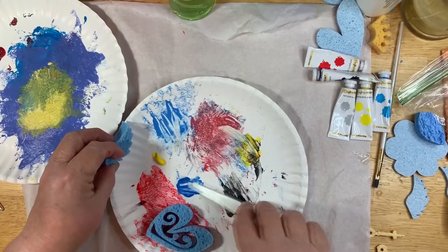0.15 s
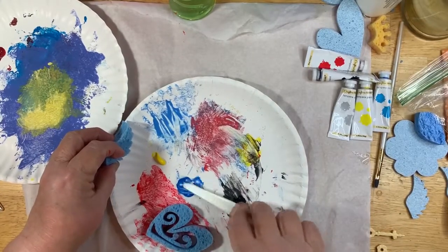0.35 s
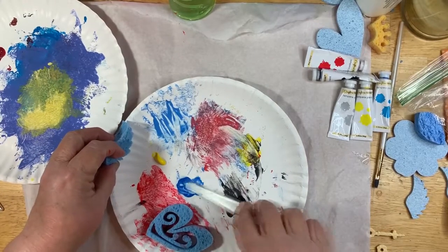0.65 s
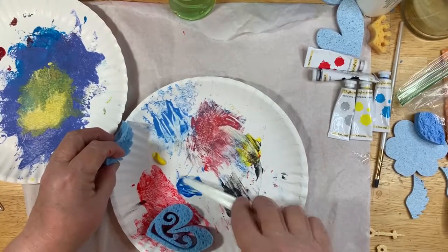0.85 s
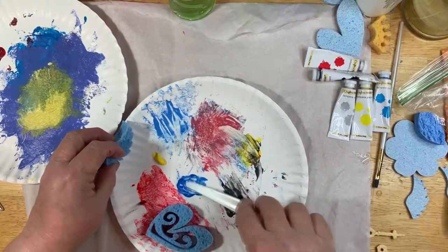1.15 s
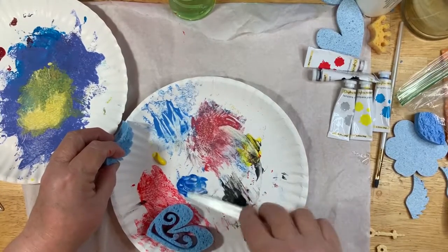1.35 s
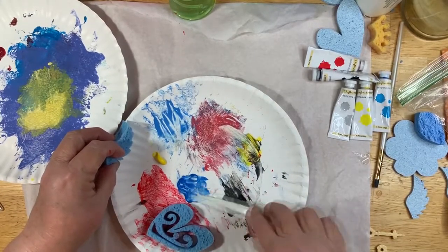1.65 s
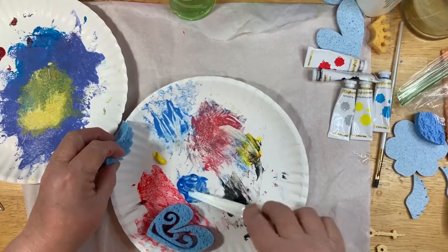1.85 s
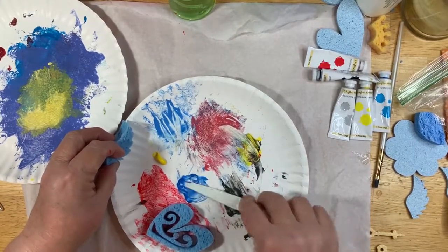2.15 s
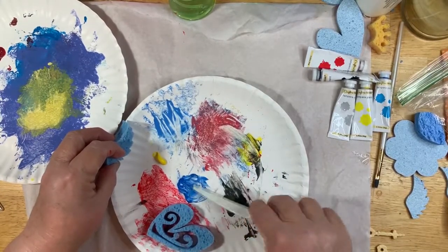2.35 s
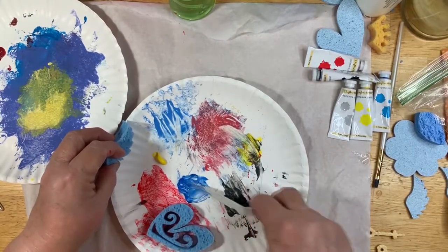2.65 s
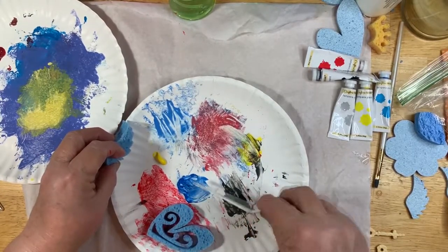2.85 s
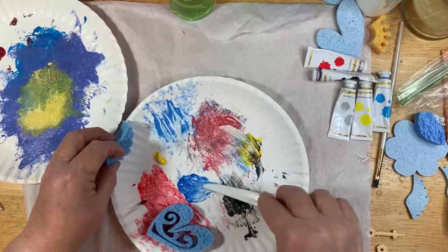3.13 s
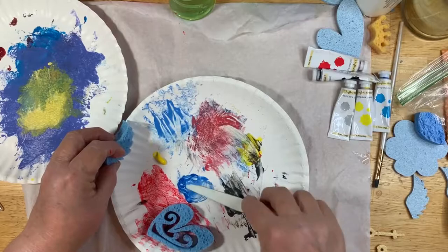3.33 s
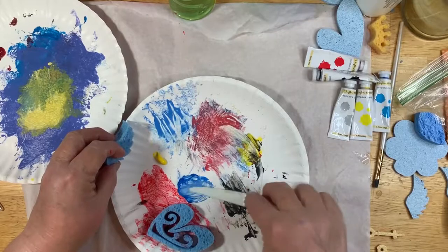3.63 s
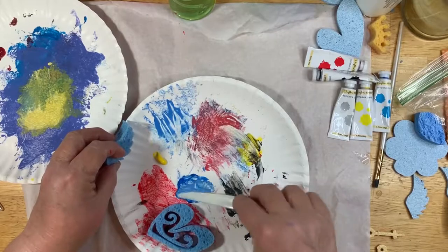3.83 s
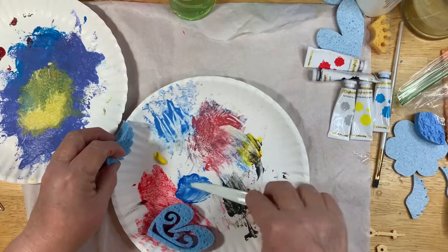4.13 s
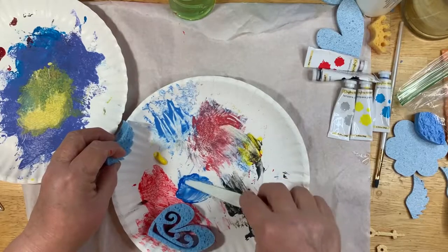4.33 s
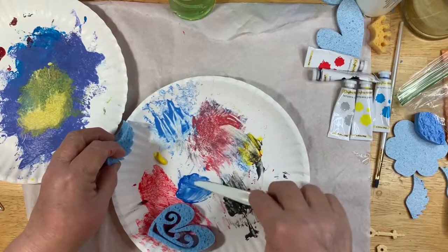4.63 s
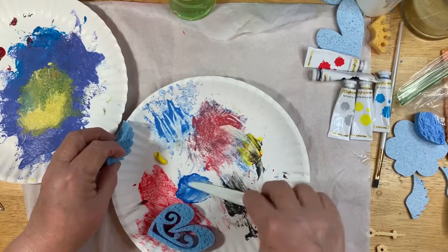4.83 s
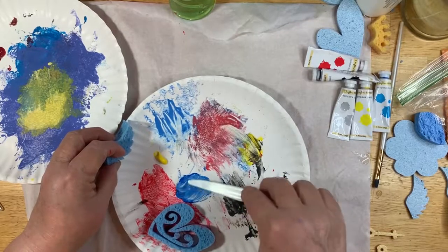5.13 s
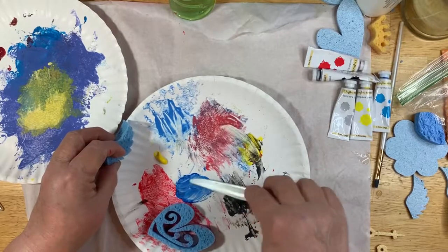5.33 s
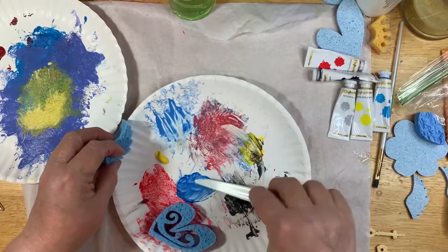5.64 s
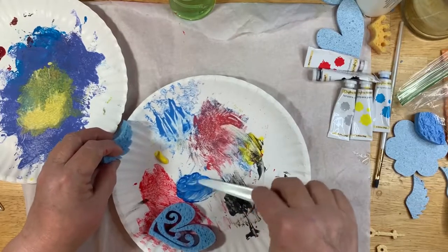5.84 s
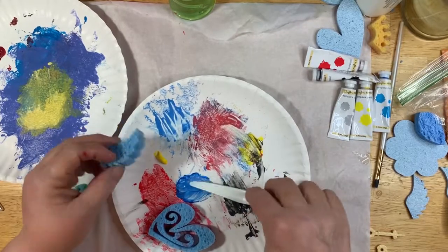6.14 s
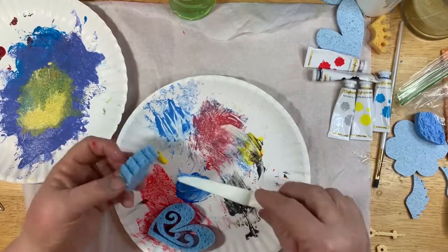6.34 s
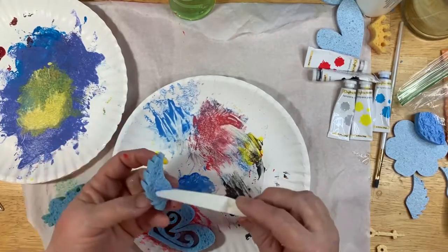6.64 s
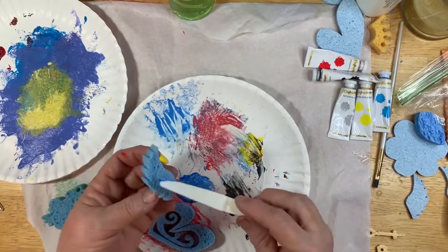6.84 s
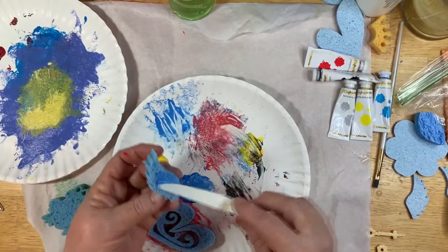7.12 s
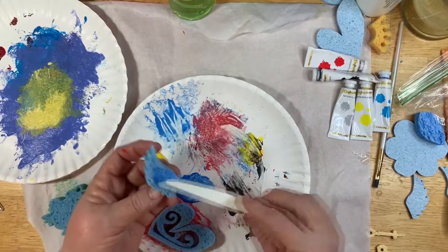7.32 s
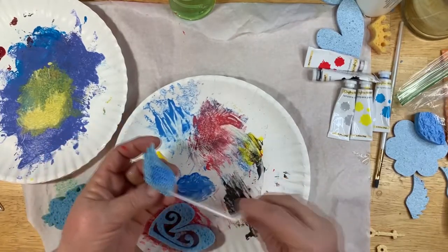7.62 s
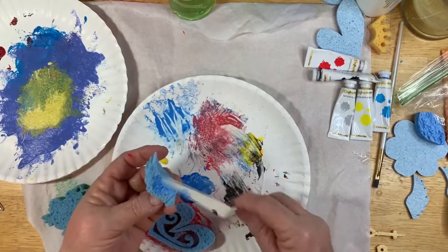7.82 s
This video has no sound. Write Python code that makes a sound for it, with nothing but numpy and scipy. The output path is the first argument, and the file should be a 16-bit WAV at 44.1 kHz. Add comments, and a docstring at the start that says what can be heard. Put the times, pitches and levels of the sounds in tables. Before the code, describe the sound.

A plastic palette knife stirs sticky paint on a paper plate, close to the microphone, about four strokes a second. Each stroke hisses and crackles, with light ticks and a few sharper slaps of the blade. After about six seconds the scraping stops, hands thump softly on the table, and the knife is faintly wiped on a sponge. A low traffic hum fills the room throughout.

```python
"""Scraping, ticking and slapping: a plastic palette knife stirs paint on a paper plate, about four
strokes a second. The dragged blade hisses and makes the plate ring, and sticky paint crackles. Hands rub
the rim and thump on the table, then the knife is wiped on a sponge. Traffic hum fills the room, an
aircraft drones far off, a bird whistles. A phase shift between left and right, growing with pitch,
widens the stereo sound."""
import sys
import numpy as np
from scipy import signal
from scipy.fft import rfft, irfft, next_fast_len
from scipy.io import wavfile
from scipy.ndimage import uniform_filter1d, map_coordinates

SR = 44100
rng = np.random.default_rng(int(sys.argv[2]) if len(sys.argv) > 2 else 0)


def inscribe(sig):
    """Save sig as 16-bit PCM at rate SR to the path in sys.argv[1].

    A 1-D sig is mono; a 2-D sig holds one channel per row.
    Samples are clipped to [-1, 1] before scaling.
    """
    pcm = np.round(np.clip(np.atleast_2d(sig).T, -1, 1) * 32767)
    wavfile.write(sys.argv[1], SR, pcm.astype(np.int16))


N = 351679
TIME = np.arange(N) / SR

# knife strokes: landing t/s, landing level/dB, fastest t/s, hiss level/dB, speeding up/s, slowing down/s,
# plate ring level/dB, extra treble from the blade's angle/dB, blade resonance f/Hz
STROKES = [(-0.1, -38.5, 0.022, -60.5, 0.14, 0.12, -68.5, 2, 3440),
           (0.221, -94, 0.296, -54, 0.077, 0.101, -66, 2, 3550),
           (0.464, -66, 0.557, -57, 0.098, 0.12, -70, 2, 3630),
           (0.757, -70.5, 0.833, -57, 0.076, 0.096, -64.5, 3.5, 3710),
           (1.04, -77, 1.116, -52, 0.072, 0.091, -66, -1.5, 3800),
           (1.273, -55, 1.39, -52.5, 0.055, 0.065, -65, 2, 3650),
           (1.525, -72, 1.622, -54.5, 0.085, 0.093, -62.5, 4.5, 3800),
           (1.75, -59, 1.849, -51.5, 0.068, 0.075, -64.5, 6.5, 3900),
           (2.045, -88, 2.132, -53.5, 0.088, 0.063, -63, 5.5, 3500),
           (2.261, -59.5, 2.415, -55, 0.12, 0.16, -67, -0.5, 3700),
           (2.711, -64.5, 2.778, -61.5, 0.015, 0.2005, -75, -10.5, 3900),
           (3.186, -66, 3.313, -61.5, 0.033, 0.067, -70.5, -4, 3500),
           (3.455, -59.5, 3.533, -54.5, 0.032, 0.11, -65.5, 3.5, 3700),
           (3.713, -61.5, 3.842, -53.5, 0.091, 0.072, -64.5, 4.5, 3820),
           (3.977, -61, 4.089, -51, 0.034, 0.075, -61, 6.5, 3720),
           (4.196, -55.5, 4.307, -53, 0.055, 0.097, -66, 2.5, 3720),
           (4.447, -61.5, 4.533, -55, 0.0166, 0.11, -68, -1, 3840),
           (4.7, -55.5, 4.819, -56.5, 0.15, 0.069, -65, 0, 3400),
           (4.93, -55, 5.044, -54.5, 0.065, 0.085, -66, 3, 3450),
           (5.183, -62, 5.298, -53.5, 0.12, 0.055, -64.5, 3, 3600),
           (5.4, -61, 5.498, -53, 0.1, 0.077, -70.5, 2, 3740),
           (5.608, -58, 5.738, -53.5, 0.13, 0.087, -72, 2.5, 3640),
           (5.828, -57, 5.96, -57, 0.13, 0.074, -77.5, 3, 3640),
           (6.082, -65, 6.196, -57, 0.14, 0.06, -69, 1, 3810),
           (6.299, -69, 6.356, -67, 0.026, 0.027, -73, -2.5, 3700)]
# tone colour of the blade's edge on paper: f/Hz, level/dB
EDGE_COLOUR = [(1500, -33), (3000, -2.5), (4300, -2), (5300, 0.5), (6000, -4), (7000, -1.5), (7800, -8),
               (9000, -5.5), (9600, -8), (10600, -0.5), (11500, -6), (14000, -8.5), (14600, -10),
               (15000, -13.5), (15600, -13.5)]
# how alike left and right are for the knife: f/Hz, likeness (1 = the same)
NEAR_LIKENESS = [(1000, 0.24), (3500, 0.74), (5500, 0.83), (8000, 1), (14000, 0.96)]
# the same for the room: f/Hz, likeness
FAR_LIKENESS = [(60, 0.87), (130, 0.89), (260, 0.34), (550, 0.15), (1500, 0.053), (4000, 0.25),
                (7000, 0.93)]


def stroke_curves():
    """Each stroke lands with a scuff, gets louder as it speeds up, then slows and peels off the paint."""
    hiss, sheen, ring, peel, blade_hz = np.zeros((5, N))
    lift_at = 0.75  # share of the slowing-down time
    sink_hz_per_s, scuff_db_per_s = 5000, 256.5
    for lands, land_db, fastest, hiss_db, rise, fall, ring_db, sheen_db, hz in STROKES:
        landed, slowing = TIME >= lands, TIME > fastest
        sinking_hz = hz - sink_hz_per_s * np.clip(TIME - fastest, -rise / 2, fall / 2)
        blade_hz = np.where(landed, np.where(TIME < fastest - rise / 2, 3345, sinking_hz), blade_hz)
        away = np.abs(TIME - fastest) / np.where(slowing, fall, rise)  # 0 at top speed
        scuff = landed * amp(land_db - scuff_db_per_s * np.abs(TIME - lands))
        lift_db = 24 * slowing * np.maximum(away - lift_at, 0)
        drag = np.hypot(scuff, landed * amp(hiss_db - 25 * away ** 1.68 - lift_db))
        hiss += drag
        sheen += drag * (amp(sheen_db) - 1)
        sag_db = np.where(slowing, 9.5, 10) * away ** 2.57  # the ring stays almost even until the lift
        ring += np.hypot(scuff, landed * amp(ring_db - sag_db))
        peel += slowing * amp(ring_db + 22.5) * np.exp(-((away - lift_at) / 0.17) ** 2)
    hiss, sheen, ring = uniform_filter1d([hiss, sheen, ring], size=SR // 160)  # paint cushions the landing
    return hiss, sheen, ring, peel, blade_hz


def scraping():
    """The dragged edge hisses and shakes the plate; paper fibres make both flutter."""
    hiss, sheen, ring, peel, blade_hz = stroke_curves()
    fibres = unit(amp(0.71 * wobble(700) + 1.7 * wobble(90)))
    edge = noise(colour(EDGE_COLOUR), NEAR_LIKENESS, patchy_db=2.5, bins=5, frames=30)
    treble = filtered(edge, lambda hz: 1 / (1 + (9000 / (hz + 1)) ** 8))
    # sticky paint lets go in sparse snaps
    snaps = filtered(amp(21) * clicks(per_s=40), colour(EDGE_COLOUR))
    peels = filtered(peel * clicks(per_s=70), plate)
    body = dragged_plate()
    blade = blade_ring(blade_hz)
    return peels + crackle(ring) + fibres * (hiss * (edge + snaps + blade) + sheen * treble + ring * body)


def plate(hz):
    """How the paper plate answers each frequency: the sum of its resonances."""
    # resonances: f/Hz, width/Hz, level/dB
    modes = [(820, 100, -8), (1140, 160, -4.5), (1675, 203, -0.5), (2054, 280, 1.5), (2236, 210, 2),
             (2526, 170, 7), (2850, 360, 4), (3680, 440, 2), (4050, 530, 3.5), (4700, 1960, 1.5)]
    return sum((-1) ** k * amp(db) * 1j * hz * width / (centre * centre - hz * hz + 1j * hz * width)
               for k, (centre, width, db) in enumerate(modes))


def dragged_plate():
    """The pressed plate's resonances drift up and down; dragging hardly stirs the low ones."""
    bend, low_cut_hz = 1.036, 1270
    blend = np.pi / 4 * (1 + np.tanh(wobble(6)))
    higher, lower = (noise(lambda hz: plate(hz * k) / (1 + (low_cut_hz / (hz + 1)) ** 4),
                           NEAR_LIKENESS, patchy_db=5, bins=2, frames=10) for k in (1 / bend, bend))
    return np.cos(blend) * higher + np.sin(blend) * lower


def blade_ring(hz):
    """The blade's resonance and a thin, high one of its edge, both with a gritty flutter."""
    blade = amp(-9 + 2.2 * wobble(70)) * narrow_noise(hz + 150 * wobble(30), width_hz=600)
    edge = amp(-11 + 2.2 * wobble(70)) * narrow_noise(6950 + 200 * wobble(12), width_hz=250)
    return blade + edge


def crackle(level):
    """Paint threads snap, each with a short ring of random pitch; their size follows the given level."""
    snaps_per_s, centre_hz, ring_cycles = 90, 3030, 14.8
    when, pitch, size = np.hsplit(rng.random((int(snaps_per_s * N / SR), 3)), 3)
    start, t = (when * N).astype(int), np.arange(SR // 100) / SR
    hz = centre_hz * np.exp(0.38 * (2 * pitch - 1))
    strength = -np.log(size + 1e-9) * level[start]
    rings = strength * np.sin(2 * np.pi * hz * t) * fade(t, ring_cycles / hz)
    return amp(6.5) * np.bincount((start + np.arange(len(t))).ravel(), rings.ravel(), N + SR)[:N]


def ticks():
    """Each tick is a short rattle of the blade that rings the plate, with a crack of treble."""
    # blade on paper: t/s, level/dB, brightness/dB
    hits = [(0.104, -39.5, -11.5), (0.2227, -52, -9), (0.257, -45, -12), (0.3316, -48, 9), (0.373, -57, 1),
            (0.3864, -43.5, -3), (0.4653, -46, -17), (0.4938, -50.5, -2), (0.6476, -39, -13),
            (0.7576, -50, -11), (0.77, -54, -15), (0.789, -45, 1), (0.9151, -42, -12.5), (1.039, -60, -10),
            (1.2057, -44.5, -21), (1.2742, -42, -15), (1.306, -49, -6), (1.453, -42, -21.5),
            (1.5508, -54.5, 3), (1.6864, -41, -17.5), (1.701, -49, 3), (1.7377, -62, -10),
            (1.7517, -45, -15), (1.91, -43.5, -8), (2.0459, -48.5, -17), (2.1477, -52, 4.5),
            (2.1734, -45, -6), (2.187, -44, -1), (2.0653, -46, -11), (2.264, -46, -2), (2.2977, -44, -5),
            (2.3415, -49, 2), (2.4941, -54, -1), (2.376, -46, 3), (2.56, -44.5, -5.5), (2.572, -44.5, -12),
            (2.5916, -47.5, -24), (2.7115, -53, -8.5), (2.733, -53, -16.5), (2.911, -45, -8),
            (2.928, -48, -14), (2.9766, -65, -25), (3.1878, -45.5, -5), (3.213, -54.5, -14),
            (3.2217, -56, -1.5), (3.2969, -53.5, 1), (3.3425, -49, -1), (3.3706, -48, -22),
            (3.4174, -73, 10), (3.4796, -43.5, -15), (3.6266, -40, -8), (3.715, -66, -13),
            (3.744, -45.5, -14), (3.8886, -41, -20), (3.902, -53, -20), (4.1907, -49.5, -7),
            (4.2303, -44.5, -3.5), (4.324, -56, -3.5), (4.375, -43, -0.5), (4.391, -49, -13),
            (4.409, -51, -14), (4.476, -46, -4), (4.607, -48, -19.5), (4.63, -54, -9), (4.69, -56, -20),
            (4.6994, -52, -15), (4.7207, -47.5, -14), (4.85, -57, -9), (4.873, -52.5, -3),
            (4.929, -65, -16), (4.95, -51, -8), (4.962, -48, -14), (5.107, -52, -8), (5.117, -52, -8),
            (5.183, -48, -23), (5.231, -53, -12), (5.327, -45, -11), (5.439, -47, -24), (5.5471, -43, -21),
            (5.643, -48, -20), (5.7842, -39.5, -23), (5.8255, -44.5, -20), (5.846, -49, -8),
            (5.879, -45.5, -20), (6.007, -44.5, -20), (6.083, -46, -20), (6.112, -54, -20),
            (6.222, -46.5, -18), (6.252, -52, -15), (6.3005, -48, -4.5)]
    # the plate rings lower or higher with the spot that is hit: pitch factor
    spots = [.9, 1, 1.12]
    pull_rise_s, usual_db, contact_hz = 0.002, -49, 6000
    blows, cracks = np.zeros((len(spots), 2, N + SR)), np.zeros((2, N + SR))
    t = np.arange(SR // 20) / SR
    for s, db, bright_db in hits:
        rattle = unit(rng.standard_normal(len(t))) + 0.5 * rng.standard_normal((2, len(t)))
        fastest = [row[2] for row in STROKES if row[0] - 0.01 < s][-1]
        if bright_db < 0 and s > fastest:  # dull and late in a stroke: paint pulls free, with no strike
            s, fade_s = s - pull_rise_s, 0.019
            rattle *= amp(3.5) * (1 - np.exp(-(t / pull_rise_s) ** 2))
        else:
            fade_s = 0.014
            rattle *= 1 - np.exp(-t / 0.00047)
            rattle[:, 1] = amp(13.5 + db - usual_db)  # harder ticks have a cleaner first strike
        blow = amp(db) * rattle * (fade(t, fade_s) + 0.079 * fade(t, 0.14))
        add_at(blows[rng.integers(len(spots))], s, blow)
        add_at(cracks, s, amp(db + bright_db) * rattle * fade(t, fade_s))
    rings = sum(filtered(blow[:, :N], lambda hz: plate(hz / k) / (1 + 1j * hz / contact_hz) ** 2)
                for blow, k in zip(blows, spots))
    return rings + filtered(cracks[:, :N], colour(EDGE_COLOUR))


def slaps():
    """The flat of the blade slaps down, heel then tip: two clean pushes ring the plate hard."""
    # slaps: t/s, level/dB, tip delay/s, tip over heel/dB
    hits = [(1.272, -39, .0026, 0), (2.2985, -33, .002, -2), (2.7114, -21, .0011, 5.5),
            (4.194, -32, .003, -1), (4.7225, -40, .003, -3), (4.9305, -38, .003, 0),
            (5.8265, -42, .002, -3)]
    contact_hz = 7000  # the contact cannot drive the plate much above this
    push = np.zeros(N)
    for s, db, delay, tip_db in hits:
        push[round(s * SR)] = amp(db)
        push[round((s + delay) * SR)] = amp(db + tip_db)
    return filtered(push, lambda hz: plate(hz) / (1 + 1j * hz / contact_hz) ** 2)


def wiping():
    """Wet paint whispers into the sponge."""
    # wipes of the knife: t/s, level/dB
    wipes = [(7.344, -67.5), (7.638, -62.5)]
    # tone colour of the sponge: f/Hz, level/dB
    sponge = [(3500, -14), (4800, -32), (5500, 0.5), (7000, -11), (8000, -4.5), (10500, 0.5), (12000, -7),
              (14000, -9), (15500, -48)]
    fade_db_per_s = 252
    level = sum(amp(db - fade_db_per_s * np.abs(TIME - s)) for s, db in wipes)
    return uniform_filter1d(level, size=SR // 40) * noise(colour(sponge), NEAR_LIKENESS, patchy_db=1.5)


def rubbing():
    """A hand rubs on the rim: a soft, fluttering band of friction."""
    # rubs: start t/s, end t/s, f/Hz, width/Hz, level/dB
    rubs = [(1.053, 1.26, 1283, 250, -70.5), (2.4, 2.473, 1156, 120, -76)]
    out = np.zeros((2, N))
    for start, end, hz, width, db in rubs:
        touching = uniform_filter1d(1. * ((TIME > start) & (TIME < end)), size=SR // 20)
        out += amp(db + 3.3 * wobble(39.6)) * touching * narrow_noise(hz, width)
    return out


def thumps():
    """The pressed plate and the hands thump on the table: dull puffs of noise, each around a pitch."""
    # thumps: t/s, peak level/dB, f/Hz
    hits = [(0.257, -71, 635), (0.65, -66, 1330), (1.69, -67, 401), (2.712, -51, 874),
            (4.465, -60.5, 352.7), (4.72, -63, 604), (4.964, -61, 339.4), (5.469, -63, 260),
            (5.638, -55.5, 602), (5.822, -56.5, 497.2), (6.101, -58, 1202), (6.92, -57.5, 1191),
            (6.925, -73, 2401), (6.931, -59, 562), (6.94, -46.5, 245.3), (7.66, -66, 480.2),
            (7.819, -75, 1312), (7.9, -70, 1101)]
    out, t = np.zeros((2, N + SR)), np.arange(SR // 4) / SR
    for s, db, hz in hits:
        fade_s = 0.17 * (500 / hz) ** 0.2  # higher thumps die sooner
        puff = rng.standard_normal((2, len(t))) * fade(t, fade_s) * (1 - np.exp(-t / 0.00099))
        band = signal.butter(2, [hz / 1.6, hz * 1.86], "bandpass", fs=SR, output="sos")
        puff = signal.sosfilt(band, puff)
        add_at(out, s, amp(db) * puff / np.abs(puff).max())
    return out[:, :N]


def room_echo(x):
    """A short wash of echoes, different left and right."""
    t = np.arange(SR // 5) / SR
    tail = rng.standard_normal((2, len(t))) * fade(t, 0.064) * (t > 0.003)
    x = filtered(x, lambda hz: 1 / (1 + (hz / 7000) ** 2))  # soft furnishings swallow the treble
    return signal.fftconvolve(x, tail / np.linalg.norm(tail[0]), axes=1)[:, :N]


def traffic_and_rustle():
    """Traffic rumble and roar, plus a soft mid-pitched rustle that swells with a few knife strokes."""
    # loudness: t/s, rumble level/dB, roar level/dB, rustle level/dB
    levels = [(0.03, -44.5, -64.5, -79), (0.68, -50.5, -69, -76), (1.1, -48, -63, -72),
              (1.5, -50, -68, -79.5), (1.96, -51.5, -68.5, -81), (2.33, -41.5, -66, -73),
              (2.83, -44.5, -66.5, -83.5), (4.43, -49, -69, -80.5), (4.87, -49, -72, -82.5),
              (5.36, -55, -73.5, -82), (5.71, -52.5, -67.5, -70), (6.21, -55, -74, -85),
              (7.31, -50, -72, -84), (7.9, -51, -71, -80.5)]
    # their three tone colours: f/Hz, level/dB
    rumble_colour = [(12, -35), (20, -21.5), (30, -5), (40, -5), (59, -3.5), (67, -0.5), (81, -6.5),
                     (122, -8.5), (151, -26.5), (200, -43.5), (260, -71), (440, -120)]
    roar_colour = [(140, -17.5), (155, -2.5), (195, -7), (300, -6.5), (340, -19), (380, -17.5),
                   (520, -14.5), (600, -27.5), (800, -30), (1000, -20)]
    rustle_colour = [(500, -15), (800, -10.5), (1200, 2.5), (1600, 2), (2200, -4.5), (3000, -18.5)]
    rumble_db, roar_db, rustle_db = curves(levels)
    dip = lambda hz: 1 - 0.85 * np.exp(-((hz - 53) / 6) ** 2)  # leaves space for the room's boom
    rumble = noise(lambda hz: colour(rumble_colour)(hz) * dip(hz) * (hz < 200),
                   FAR_LIKENESS, patchy_db=-0.58)
    roar = noise(lambda hz: colour(roar_colour)(hz) * (hz < 1000),
                 FAR_LIKENESS, patchy_db=4.5, bins=2, frames=20)
    rustle = noise(colour(rustle_colour + [(6000, -58)]), FAR_LIKENESS, patchy_db=3, bins=2, frames=20)
    return amp(rumble_db) * rumble + amp(roar_db) * roar + amp(rustle_db) * rustle


def room_boom():
    """The room's lowest resonance picks a boom out of the traffic; it throbs against a steadier hum."""
    # the boom and the hum: t/s, f/Hz, level/dB
    boom = [(0.0, 48.23, -40.5), (0.49, 50.4, -38), (0.62, 50.9, -56), (0.71, 53.45, -43),
            (0.93, 53.12, -47), (1.4, 50.51, -43.5), (1.91, 53.2, -45), (2.04, 52.56, -43), (2.13, 50, -57),
            (2.17, 49.54, -38), (2.31, 48.9, -24), (2.44, 48.65, -38.5), (2.62, 51.96, -29.5),
            (2.73, 53.48, -39.5), (2.86, 49.26, -40.5), (2.95, 48.8, -26.5), (3.13, 50.2, -38.5),
            (3.42, 53.2, -38), (3.86, 52.58, -48.5), (3.97, 50.5, -36), (4.13, 50.37, -47),
            (4.26, 50.8, -34.5), (4.33, 52.33, -57), (4.42, 53.24, -42), (4.62, 49.34, -50),
            (4.79, 52.89, -41), (5.9, 53.48, -52.5), (6.04, 50, -51), (6.13, 53.26, -52), (6.66, 52.9, -58),
            (6.9, 49.55, -46), (7.08, 53.29, -39), (7.77, 53.13, -49), (7.97, 47.84, -43)]
    hum = [(0, 56, -53), (2, 56.82, -68), (2.8, 55.36, -54.5), (4, 56.1, -56), (6.5, 55.5, -51.5),
           (7.1, 56.31, -48.5), (7.97, 56.51, -50.5)]
    return tone(boom, waver_hz=0.5335, rate=4.4) + tone(hum)


def aircraft():
    """A far aircraft drones on one wavering, slowly falling note."""
    # the drone: t/s, f/Hz, level/dB
    drone = [(0, 343, -80.5), (1.5, 341, -78.5), (3, 327.5, -76), (3.9, 322.2, -77), (4.1, 321.5, -91),
             (5.6, 307, -99), (6, 299.4, -85), (7.97, 296.9, -83.5)]
    return tone(drone, waver_hz=5.9, waver_db=3.5, rate=25)


def bird():
    """A bird whistles two short, overlapping notes."""
    # one list for each note: t/s, f/Hz, level/dB
    notes = [
        [(.09, 5300, -100), (.11, 5200, -82), (.15, 5400, -80), (.185, 5250, -79), (.215, 5040, -78),
         (.23, 4740, -100)],
        [(.16, 7300, -100), (.195, 7000, -80), (.22, 6770, -100)],
    ]
    return sum(tone(note) for note in notes)


def whines():
    """Faint, distant tones fade in, waver and fade out."""
    # tones: start t/s, end t/s, f/Hz, level/dB
    notes = [(4.3, 6.1, 525, -83), (4.4, 6.2, 915, -87), (5.6, 6.9, 1205, -92.5), (2.0, 3.3, 1900, -95)]
    return sum(tone([(start - 0.2, hz, -120), (start, hz, db), (end, hz, db), (end + 0.14, hz, -120)],
                    waver_hz=6, waver_db=3.5, rate=25) for start, end, hz, db in notes)


def background_hiss():
    """A very quiet hiss lies under everything."""
    # its tone colour: f/Hz, level/dB
    hiss_colour = [(1000, -8), (2500, 5), (5000, 3.5), (7000, 5.5), (13300, 2.5), (13700, -22.5),
                   (14900, -5), (15100, -29.5)]
    return amp(-82.5) * noise(colour(hiss_colour), FAR_LIKENESS, patchy_db=2)


def amp(db):
    """Turn decibels into a gain."""
    return 10 ** (np.asarray(db) / 20)


def fade(t, seconds):
    """Die away by 60 dB in the given time."""
    return amp(-60 * t / seconds)


def unit(x):
    """Scale to an average (rms) level of 1."""
    return x / np.sqrt(np.mean(x ** 2) + 1e-20)


def add_at(track, s, sound):
    """Mix a stereo sound in at s seconds."""
    track[:, round(s * SR):][:, :sound.shape[1]] += sound


def along(points, hz):
    """Join (Hz, value) points on a log frequency axis."""
    f, v = np.transpose(points)
    return np.interp(np.log(hz + 1), np.log(f + 1), v)


def colour(points):
    """Gain by frequency from (Hz, dB) points, falling steeply below the first."""
    return lambda hz: amp(along([(points[0][0] / 2, -120)] + list(points), hz))


def curves(rows):
    """One value per sample for each column after the time."""
    s, *cols = np.transpose(rows)
    return [np.interp(TIME, s, c) for c in cols]


def wobble(rate):
    """A smooth random curve through rate points a second."""
    return map_coordinates(rng.standard_normal(int(N * rate / SR) + 4), [np.arange(N) * rate / SR])


def clicks(per_s):
    """Clicks of random time and size."""
    return (rng.random(N) < per_s / SR) * rng.standard_normal(N)


def filtered(x, response):
    """Change the gain and phase of each frequency in x by response(hz)."""
    m = next_fast_len(N + SR // 2)
    return irfft(rfft(x, m) * response(np.fft.rfftfreq(m, 1 / SR)), m)[..., :N]


def noise(response, likeness, patchy_db, bins=4, frames=6):
    """Coloured stereo noise of level 1, with random louder and softer patches (bins wide, frames long)."""
    spectrum = signal.stft(rng.standard_normal((2, N)), nperseg=256)[2]
    patches = uniform_filter1d(rng.standard_normal(spectrum.shape[1:]), bins, 0)
    patches = unit(uniform_filter1d(patches, frames, 1))
    pair = signal.istft(spectrum * amp(patchy_db * patches), nperseg=256)[1][:, :N]
    spread = lambda hz: np.arccos(np.clip(along(likeness, hz), -1, 1)) / 2
    mid, side = filtered(pair, lambda hz: response(hz) * [np.cos(spread(hz)), np.sin(spread(hz))])
    return unit(np.array([mid + side, mid - side]))


def narrow_noise(hz, width_hz):
    """Stereo noise of level 1 in a narrow band whose centre may move."""
    pair = rng.standard_normal((2, N)) + 0.17 * rng.standard_normal((2, 2, N))
    slow = filtered(pair, lambda f: 1 / (1 + (f / width_hz) ** 2))
    phase = 2 * np.pi * np.cumsum(hz * np.ones(N)) / SR
    return unit(slow[:, 0] * np.cos(phase) + slow[:, 1] * np.sin(phase))


def tone(rows, waver_hz=0, waver_db=0, rate=8):
    """A pure tone that follows (s, Hz, dB) rows; pitch and level can waver at random."""
    hz, db = curves(rows)
    hz, db = hz + waver_hz * wobble(rate), db + waver_db * wobble(rate)
    return np.sqrt(2) * amp(db) * np.sin(2 * np.pi * np.cumsum(np.abs(hz)) / SR)


def scene():
    """The knife, louder on the right, with its echo, the other table sounds and the background."""
    # the knife's boost on the right: f/Hz, level/dB
    right_boost = [(1200, 3.5), (2000, 2), (2500, 8.5), (2900, 0.5), (4000, 4), (5500, 2), (7000, 0)]
    knife = filtered(scraping() + ticks() + slaps(), lambda hz: amp([0 * hz, along(right_boost, hz)]))
    near = knife + amp(-10.5) * room_echo(knife) + wiping() + rubbing() + thumps()
    return near + traffic_and_rustle() + whines() + room_boom() + aircraft() + bird() + background_hiss()


def record(dry):
    """A left-right phase shift, growing with pitch, widens the sound; the highest treble is cut off."""
    # shift between left and right: f/Hz, phase/rad
    phase_shift = [(0, 0), (260, 0), (800, 3.1), (1210, 5.8), (1810, 6.7), (2670, 7.8), (3360, 6.1),
                   (3790, 7.1), (4350, 7.4), (4780, 9.5), (5860, 11), (6400, 12.3), (7490, 12.6),
                   (9040, 15.3), (9700, 15.7), (10200, 16), (11800, 18.6), (12800, 19), (14600, 22),
                   (16000, 22.1)]
    top_hz = 15757
    half_shift = lambda hz: np.interp(hz, *np.transpose(phase_shift)) / 2
    return filtered(dry, lambda hz: np.exp(1j * np.outer([1, -1], half_shift(hz))) * (hz < top_hz))


dry = scene()
out = record(dry)
inscribe(out)
```